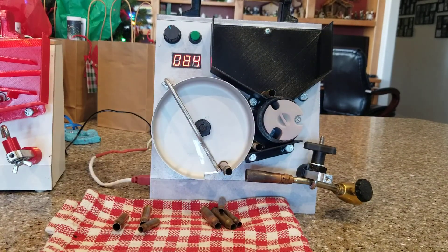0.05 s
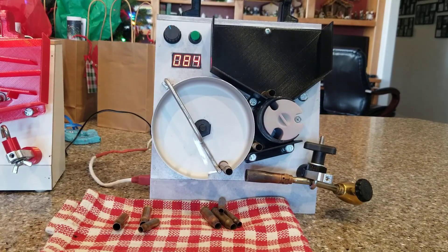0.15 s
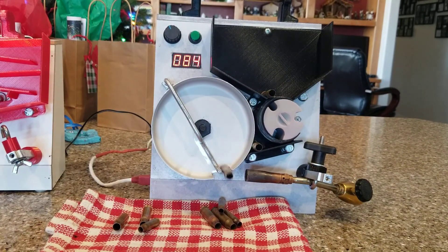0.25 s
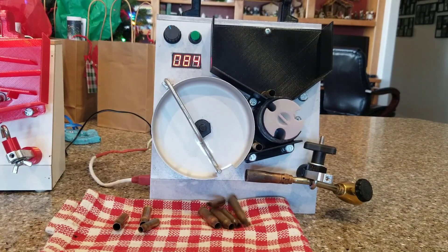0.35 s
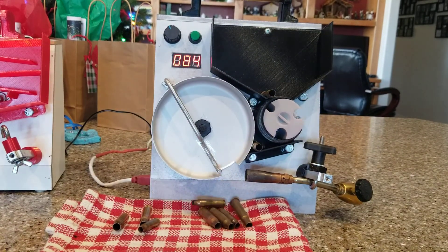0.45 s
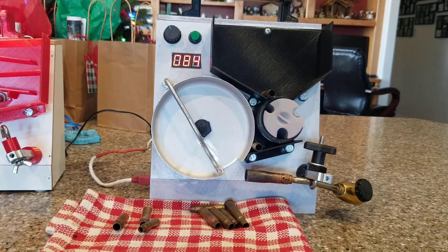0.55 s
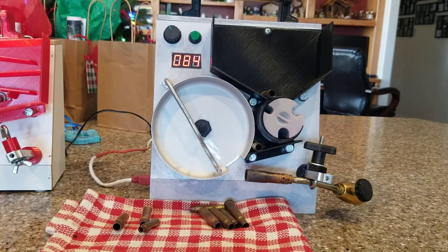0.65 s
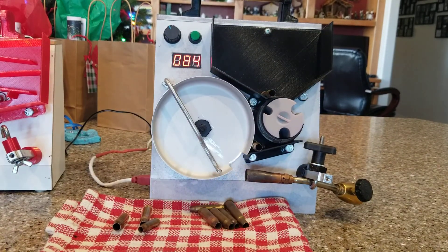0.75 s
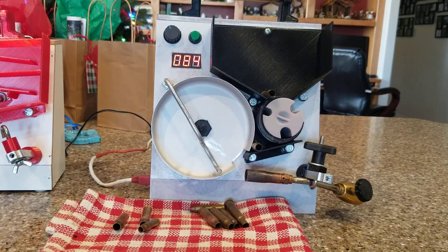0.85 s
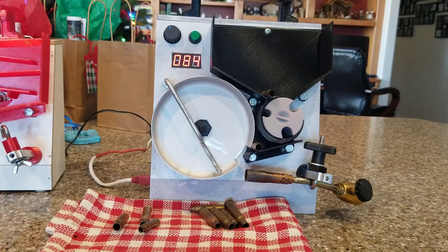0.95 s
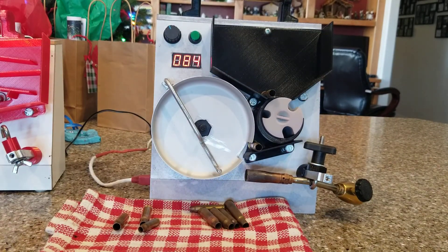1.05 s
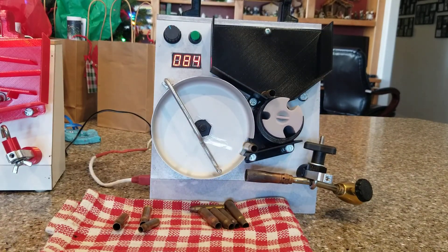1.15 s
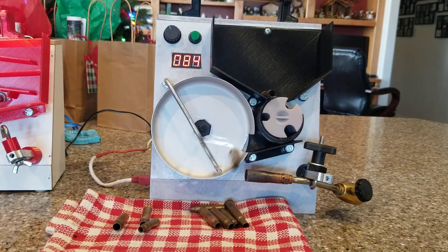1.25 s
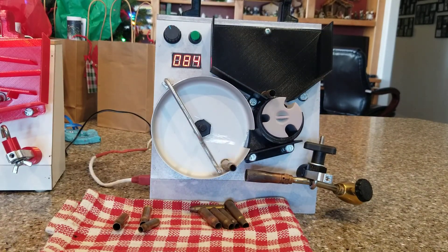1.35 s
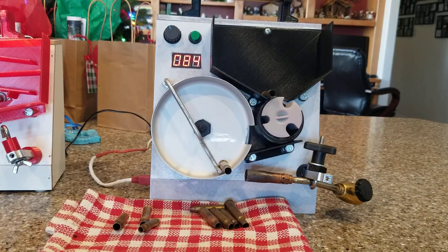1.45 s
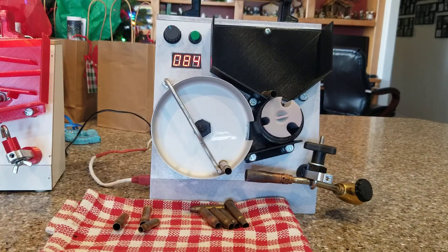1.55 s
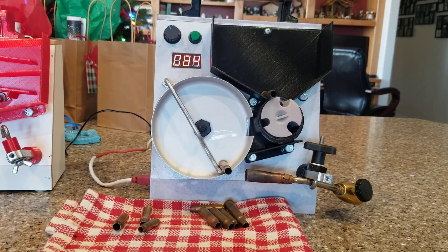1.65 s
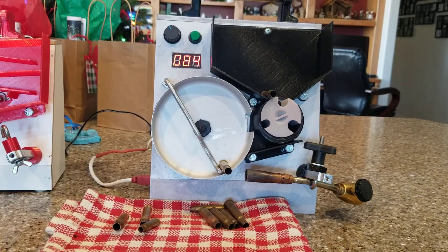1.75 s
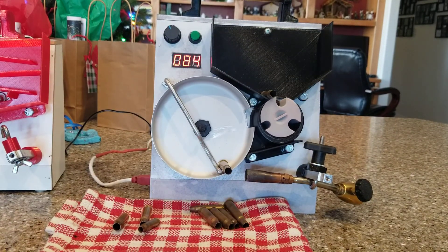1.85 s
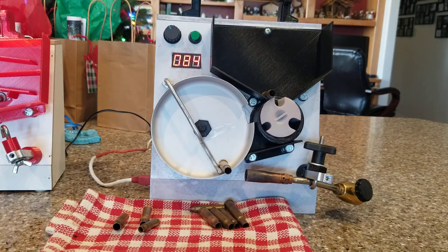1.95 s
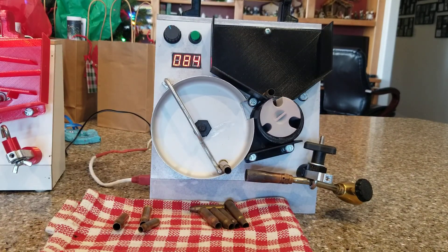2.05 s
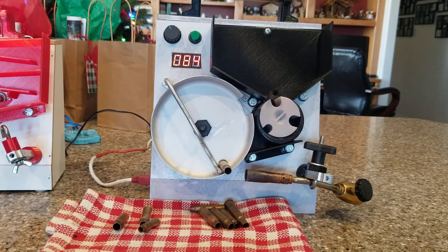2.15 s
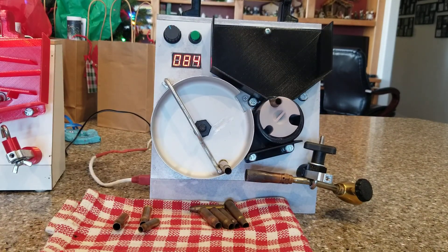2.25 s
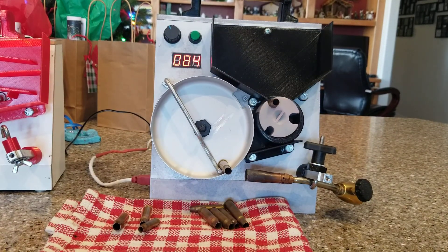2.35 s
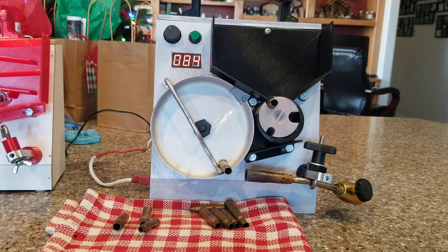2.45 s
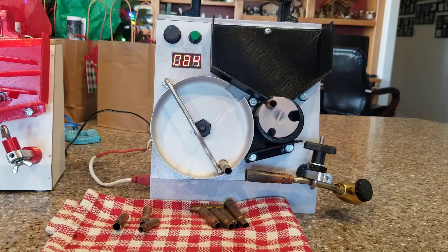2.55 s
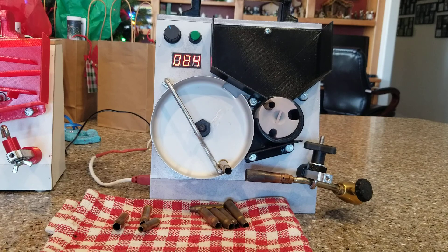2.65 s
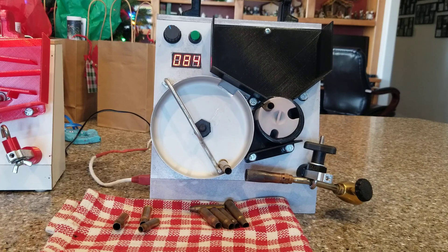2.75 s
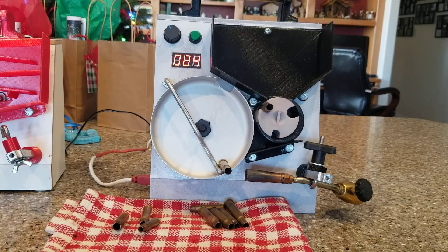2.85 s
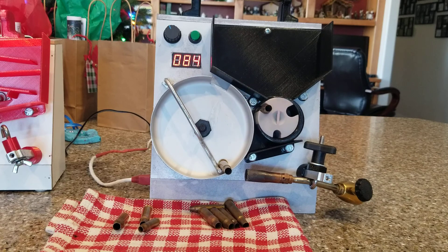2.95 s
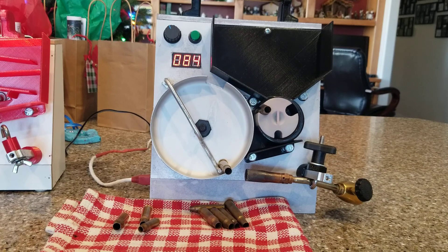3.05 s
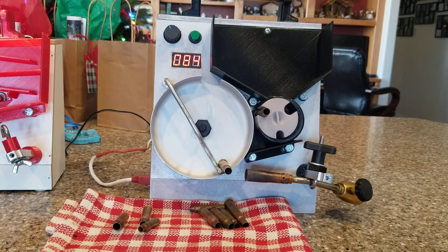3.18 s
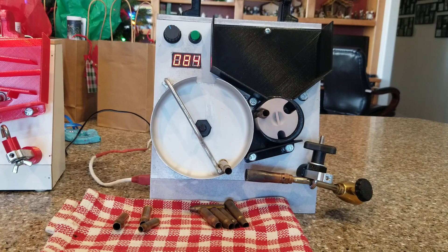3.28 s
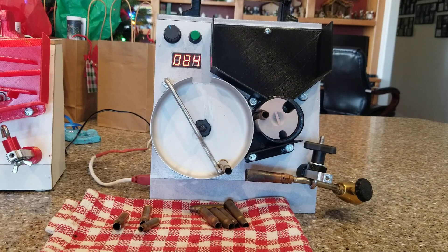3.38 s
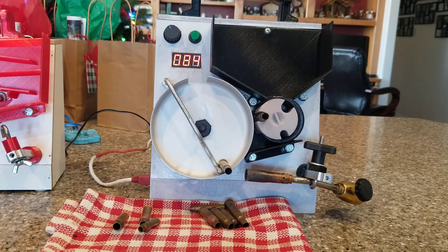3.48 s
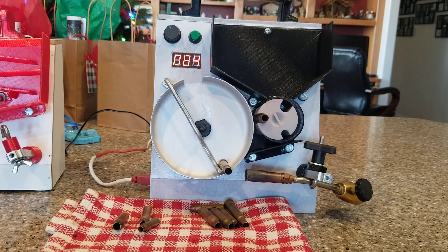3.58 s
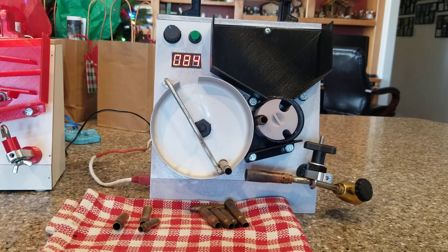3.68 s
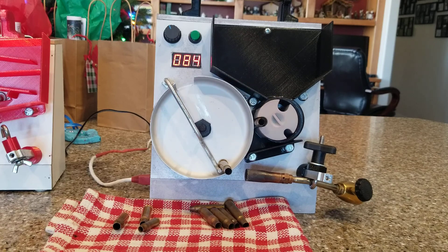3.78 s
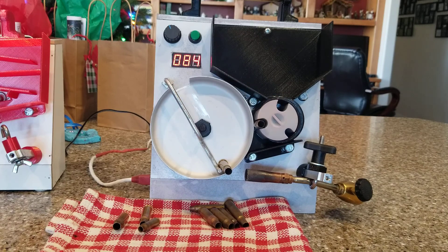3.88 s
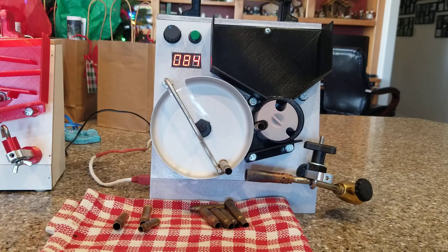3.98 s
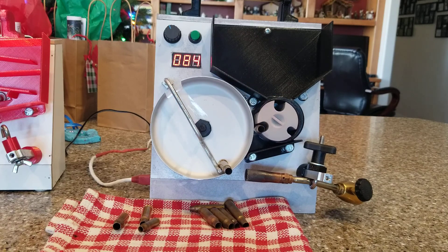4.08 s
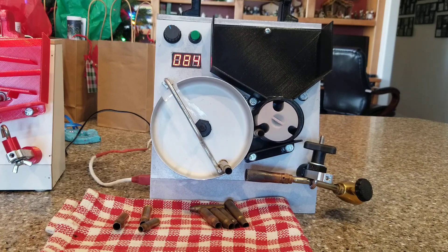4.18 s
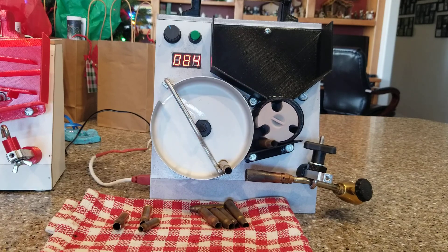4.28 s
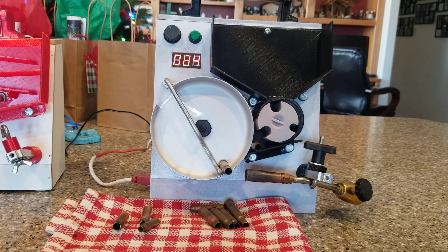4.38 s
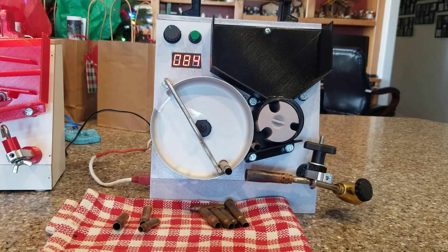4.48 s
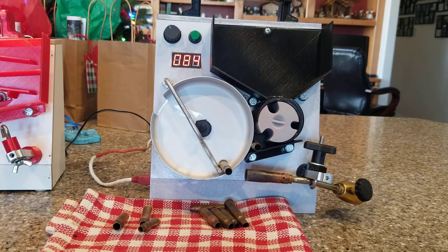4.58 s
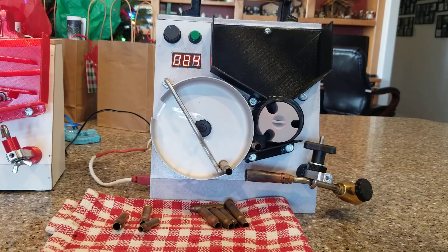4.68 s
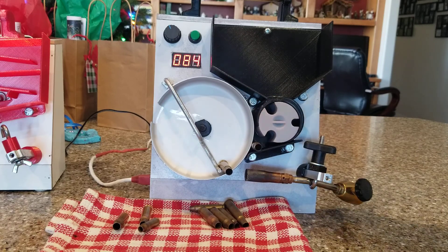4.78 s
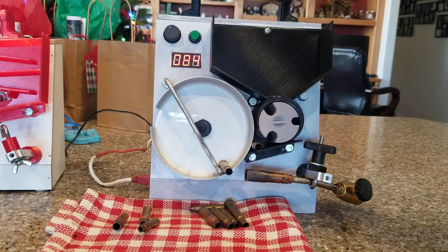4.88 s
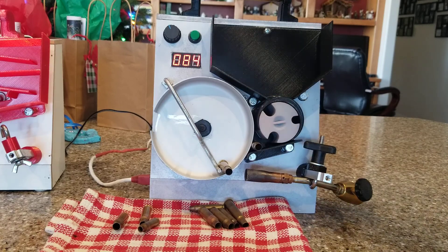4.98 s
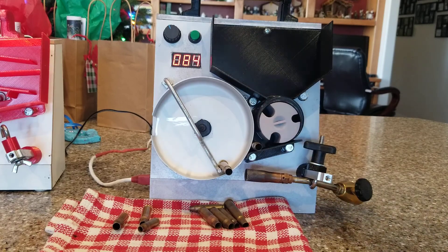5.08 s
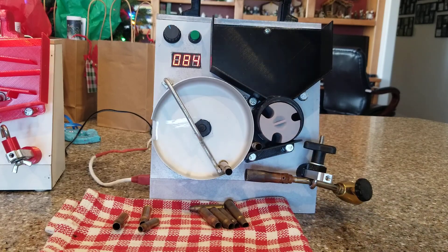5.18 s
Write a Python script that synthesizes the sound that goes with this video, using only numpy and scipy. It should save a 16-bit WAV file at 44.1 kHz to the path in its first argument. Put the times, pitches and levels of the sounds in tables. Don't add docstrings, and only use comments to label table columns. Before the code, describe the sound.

Brass cartridge cases clink on a pile, tumble ringing into a steel drum, then click through a feed wheel over a faint motor hum.

```python
import sys
import numpy as np
from scipy import signal
from scipy.fft import rfft, irfft, next_fast_len
from scipy.io import wavfile

SR = 44100
rng = np.random.default_rng(int(sys.argv[2]) if len(sys.argv) > 2 else 0)


def volts(x):
    e = np.asarray(x, float) / 20
    return 10 ** e


def generate_wav(signal):
    frames = np.transpose(np.atleast_2d(signal))
    scaled = np.clip(frames, -1, 1) * 32767
    pcm = np.round(scaled).astype(np.int16)
    wavfile.write(sys.argv[1], SR, pcm)


N = 230591

# (time [s], 15th order pitch [Hz], 15th order level [dB], load level [dB])
MOTOR = [(0, 1178, -76, -55.5), (.3, 1180, -67.5, -61.5), (1.05, 1180, -73, -62), (1.3, 1190, -83.5, -63.5),
         (2.05, 1215, -85, -56.5), (2.65, 1228, -70.5, -57.5), (3.2, 1243, -65.5, -57.5),
         (4.1, 1247, -65.5, -52.5), (4.3, 1240, -55, -40.5), (4.7, 1213, -71.5, -57.5),
         (5.23, 1210, -73, -53.5)]
# (time [s], pressure [dB])
RUB = [(0, -68.5), (.3, -62.5), (.6, -68), (1.0, -62), (1.12, -78), (2.3, -71.5), (2.8, -74.5),
       (3.75, -75.5), (3.9, -61), (4.2, -54.5), (4.47, -56.5), (4.6, -57), (5.23, -58)]
# (time [s], ring [dB], thud [dB], tick [dB])
PILE_HITS = [
    (.0794, -78.5, -57, -72),
    (.3225, 2, -52, -27.5),
    (.333, -2, -46.5, -35),
    (.383, -49, -72, -48),
    (.407, -49, -74, -39),
    (.427, -48, -79, -36),
    (.468, -44, -54, -54),
    (.5131, -30, -58.5, -38.5),
    (.545, -46, -69, -42),
]
RAMP_HITS = [
    (1.1989, -24.5, -44, -33),
    (1.2084, -25, -35, -36),
    (1.2462, -39, -35, -46.5),
    (1.2627, -16.5, -40.5, -36.5),
    (1.2784, -22.5, -38.5, -32.5),
]
DRUM_HITS = [(1.2875, -14, -37, -61), (1.2954, -10.5, -34.5, -53), (1.3099, -2, -32.5, -43),
             (1.3324, 1.5, -28.5, -39.5), (1.3504, 1.5, -36, -46.5), (1.3704, -4, -33.5, -47.5),
             (1.3884, -15.5, -35.5, -52.5), (1.3974, -25, -43, -47), (1.4204, -2, -39, -42),
             (1.4314, -35, -39.5, -53), (1.4514, -15, -38.5, -40), (1.482, -40, -47.5, -55)]
HOPPER_HITS = [
    (2.1814, -19, -30.5, -44.5),
    (2.1869, -48.5, -36.5, -57),
    (2.1994, -48, -34.5, -50),
    (2.2164, -46, -50, -53.5),
    (2.2253, -18, -40, -50.5),
    (2.2354, -33, -33.5, -72),
    (2.2436, -53, -35.5, -58),
    (2.2544, -40, -45, -71.5),
    (2.282, -49, -58, -67),
]
WHEEL_HITS = [(3.7953, -41, -42, -41), (3.9699, -75, -66, -82), (4.148, -54, -45, -48),
              (4.1684, -53.5, -84.5, -71), (4.2348, -60, -39.5, -54.5), (4.2477, -40, -39.5, -45),
              (4.2614, -62, -42, -85), (4.2814, -58, -30.5, -48), (4.2862, -42, -29, -42),
              (4.3254, -58, -56, -82), (4.367, -38, -37.5, -40), (4.3844, -45, -36.5, -47),
              (4.3994, -31.5, -52, -53), (4.4164, -56, -74, -58), (4.4912, -44, -41, -43),
              (4.6094, -53, -63, -81), (5.0694, -74, -65, -80)]
# (time [s], level [dB])
DRUM_KNOCKS = [(1.1991, -36), (1.2072, -37), (1.2466, -30.5), (1.2635, -26.5), (1.2793, -28),
               (1.2868, -29.5), (1.2934, -35.5), (1.3105, -32), (1.3335, -31.5), (1.3502, -38.5),
               (1.3916, -28.5), (1.4205, -36.5), (1.452, -42)]


def rms_one(x):
    return x / np.sqrt(np.mean(x ** 2) + 1e-20)


def in_time(rows):
    times, *columns = np.transpose(rows)
    return [np.interp(np.arange(N) / SR, times, column) for column in columns]


def colour(x, points, lag_s=0, turns=((1, 0),)):
    size = next_fast_len(N + 2048)
    hz = np.arange(size // 2 + 1) * SR / size + 1e-3
    point_hz, point_db = np.transpose(points)
    gain = volts(np.interp(np.log(hz), np.log(point_hz), point_db))
    phase = 2 * np.pi * hz * lag_s + np.interp(hz, *np.transpose(turns))
    return irfft(rfft(x, size) * gain * np.exp(-1j * phase), size)[:N]


def noise(points):
    return rms_one(colour(rng.standard_normal(N), [(5, -90)] + list(points) + [(22000, -90)]))


def drift(rate_hz):
    r = np.exp(-80 * np.pi * rate_hz / SR)
    slow = signal.lfilter([1], [1, -2 * r, r * r], rng.standard_normal(N // 40 + 2002))[2000:]
    return np.interp(np.arange(N) / 40, np.arange(len(slow)), rms_one(slow))


def ring(push, hz, t60):
    r = volts(-60 / (t60 * SR))
    w = 2 * np.pi * hz / SR
    return signal.lfilter([0, np.sin(w)], [1, -2 * r * np.cos(w), r * r], push + 1e-18)


def band(x, low_hz, high_hz):
    sos = signal.butter(2, [low_hz, min(high_hz, .45 * SR)], "band", fs=SR, output="sos")
    return signal.sosfilt(sos, x)


def struck(times, levels_db, modes, spread_db, longest):
    at = (np.asarray(times) * SR).astype(int)
    out = np.zeros(N)
    span = slice(at.min(), at.max() + SR // 2)
    chance = rng.standard_normal((len(at), len(modes)))
    for k, (hz, db, t60) in enumerate(modes):
        clicks = np.zeros(N)
        clicks[at] = volts(levels_db + db + spread_db * chance[:, k])
        out[span] += ring(clicks[span], hz, min(t60, longest)) - ring(clicks[span], hz, .005)
    return out


def rings(hits, modes, ring_db, longest):
    hits = np.array(hits)
    return struck(hits[:, 0], hits[:, 1] + ring_db, modes, 2.965, longest)


def clear_modes(pitches, modes, swell_s):
    out, t = np.zeros(N), np.arange(N + SR) / SR
    spin = np.array([drift(40), drift(30)])
    age = t[1:SR // 2 + 1]
    for hz, (t60, touches) in zip(pitches, modes):
        height = np.zeros(N + SR)
        rise = swell_s * min(1, 8000 / hz) ** 2
        for s, db in touches:
            after = slice(int(s * SR), int(s * SR) + SR // 2)
            height[after] *= np.exp(-age / .002)
            height[after] += volts(db - 60 * age / t60) * (1 - np.exp(-age / max(rise, 3e-4))) ** 2
        span = slice(int(touches[0][0] * SR), min(after.stop, N))
        loudness, pitch = np.roll(spin, rng.integers(N), axis=1)[:, span]
        out[span] += height[span] * volts(1.2 * loudness) * np.sin(2 * np.pi * hz * t[span] + .35 * pitch)
    return out


def crowd(blows, low_hz, high_hz, t60, db, count=90):
    out = np.zeros(N + SR)
    age = np.arange(min(SR // 3, int(2 * t60 * SR))) / SR
    pitch, life = rng.random((2, count, 1))
    hz = low_hz * (high_hz / low_hz) ** pitch
    lives = t60 * 1.6 ** (2 * life - 1)
    modes = volts(-60 * age / lives) * np.sin(2 * np.pi * hz * age)
    mixes = rng.standard_normal((len(blows), count)) @ modes / np.sqrt(count / 2)
    mixes = mixes * (1 - np.exp(-age / 0.001))
    for (s, blow_db), mix in zip(blows, mixes):
        out[int(s * SR):int(s * SR) + len(age)] += volts(blow_db + db) * mix
    return out[:N]


def contacts(hits, knock_over_tick_db, t60):
    return [(s, thud_db, tick_db + knock_over_tick_db, tick_db, t60) for s, _, thud_db, tick_db in hits]


def knocks(hits, body, body_db):
    s, thud_db, knock_db, tick_db, t60 = np.transpose(hits)
    shape, crack = np.zeros((3, N + SR)), np.zeros((3, N))
    age = np.arange(SR // 2) / SR
    for k in range(len(s)):
        at = int(s[k] * SR)
        gains = volts([thud_db[k], knock_db[k], tick_db[k]])[:, None]
        shape[:, at:at + len(age)] += gains * volts(-60 * age / max(t60[k], .005))
        crack[:, at:at + 40] += gains * rng.choice([-1, 1], 40) * volts(9 - 60 * age[:40] / 0.00075)
    crack[0] *= .3
    force = crack + shape[:, :N] * rng.standard_normal((3, N)) * volts(2.5 * drift(300))
    rattle = np.zeros(N)
    ranges_hz = [(330, 1300), (1300, 6500), (6500, 15800)]
    for part, share, (low, high) in zip(force, [.4, 1, 1], ranges_hz):
        part = band(band(share * part, low, high), 0.74 * low, high)
        rattle += part / np.sqrt(2 * (high - low) / SR)
    shake = band(band(force[0], 300, 2500), 270, 4000)
    for hz, db, _ in body:
        rattle += volts(db - 6) * ring(shake, hz, 0.02) / np.sqrt(.07 * SR / 28)
    return rattle + struck(s, thud_db + body_db, body, 3, 0.15)


def air():
    # (pitch [Hz], level per Hz [dB])
    air_colour = [(20, -49), (38, -8.5), (60, 5.5), (120, 7), (250, -15.5), (600, 5), (1300, -8),
                  (2000, -34.5)]
    load_db = in_time(MOTOR)[2]
    return volts(-70 + 0.71 * (load_db + 62) + 2 * drift(2.7)) * noise(air_colour)


def motor():
    # (time [s], level [dB])
    early_drone = [
        (0, -81.5),
        (.4, -65.5),
        (1.1, -63.5),
        (1.3, -86),
        (5.23, -98),
    ]
    # (order [turns], level over the load [dB])
    orders = [(1, -15.5), (3, -13.5), (9, -10), (14, -14.5), (16, -11.5)]
    # (pitch [Hz], width [Hz], level [dB])
    gears = [(332.3, 15.8, -6.5), (380.6, 6.2, -10), (449, 46, -6.5), (507.4, 25, -16), (710, 38, -18),
             (833, 11.87, -13.5), (1194, 86.4, -12), (2980, 150, -11.5), (4115, 25, -21),
             (4740, 208.5, -24.5), (9100, 270, -28.5)]
    whine_hz, whine_db, load_db = in_time(MOTOR)
    turn = 2 * np.pi * np.cumsum(whine_hz) / 15 / SR
    out = volts(whine_db + 5 + 2.2 * drift(19.1)) * np.sin(15 * turn + 0.54 * drift(21))
    drone_db = in_time(early_drone)[0] + 1.5 * drift(7)
    out += volts(drone_db) * (np.sin(6 * turn) + 0.47 * np.sin(8.7 * turn))
    for order, db in orders:
        out += volts(load_db + db - 7 + 3.2 * drift(7.1)) * np.sin(order * turn)
    teeth = rng.standard_normal(N) * (1 + 0.2 * np.cos(turn))
    for hz, width_hz, db in gears:
        tone = ring(ring(teeth, hz, 1.6 / width_hz), hz, .8 / width_hz)
        out += volts(load_db + db - 3.5 + 3.5 * drift(9)) * rms_one(tone)
    return out


def rubbing():
    # (pitch [Hz], level per Hz [dB])
    rub_low = [(200, 7), (500, -17.5), (1500, 9), (2200, 0.5), (4000, -3.5), (6500, -5.5), (8000, -39)]
    rub_high = [(5000, -26), (7200, -10), (8400, 3), (9500, -8), (10500, -1.5), (13000, 4), (16000, -2)]
    pressure_db, = in_time(RUB)
    grain = volts(1.5 * drift(23) + 1.5 * drift(5))
    return grain * (volts(pressure_db - 1) * noise(rub_low) + volts(pressure_db - 3.5) * noise(rub_high))


def chatter():
    start_s, end_s = 4.2, 4.8
    when, luck = rng.random((2, 70))
    times = start_s + when * (end_s - start_s)
    levels_db = np.interp(times, *np.transpose(RUB)) + 16 * luck
    return crowd(list(zip(times, levels_db)), low_hz=3196, high_hz=15501, t60=0.016, db=-3, count=24)


def bumps():
    # (time [s], level [dB])
    shudders = [
        (0.069, -61.5),
        (.52, -75),
        (2.27, -61),
        (4.6, -56.5),
        (5.08, -65),
        (5.168, -61),
    ]
    rise_s = 0.024
    times, levels_db = np.transpose(shudders)[:, :, None]
    age = np.maximum(np.arange(N) / SR - times, 0) / rise_s
    swell = np.sum(volts(levels_db) * age * np.exp(1 - age), axis=0)
    return swell * rms_one(band(rng.standard_normal(N), 55.7, 230))


def feeder():
    # (pitch [Hz], level [dB], t60 [s])
    hopper_modes = [(2584, -8, .08), (5600, -20, .03), (8441, -14, .06), (11210, -10, .06),
                    (12540, -24, .1), (14600, -14, .1)]
    wheel_modes = [(2587, -8, .1), (3900, -10, .1), (4423, -8, .1), (5600, -10, .06), (8300, -10, .1),
                   (12860, -14, .06), (13500, -12, .06), (14600, -15, .1)]
    # (time [s], level [dB], start pitch [Hz], end pitch [Hz], length [s])
    slips = [
        (2.434, -44, 14000, 10900, 0.0097),
        (2.546, -55, 13400, 11570, 0.0022),
        (2.574, -57, 12900, 11800, 0.0033),
    ]
    out = rings(HOPPER_HITS, hopper_modes, -0.44, 0.014) + rings(WHEEL_HITS, wheel_modes, 1.1, 0.12)
    for s, db, from_hz, to_hz, length_s in slips:
        count, at = int(length_s * SR), int(s * SR)
        glide = np.cumsum(np.linspace(from_hz, to_hz, count)) / SR
        out[at:at + count] += volts(db) * np.hanning(count) * np.sin(2 * np.pi * glide)
    return out


def drum():
    # (pitch [Hz], level [dB], t60 [s])
    drum_modes = [(3171, -30, .3), (3402, -26, .3), (5017, -32, .2), (7903, -25, .3), (10720, -18, .3),
                  (11350, -25, .3), (11940, -17, .15), (12050, -19, .2), (6880, -28, .3), (14510, -18, .07),
                  (15490, -27, .1)]
    boom_s, boom_db, boom_hz = 1.295, -38.5, 93.5
    hold_s, t60, rise_s = .13, .2, .04
    age = np.maximum(np.arange(N) / SR - boom_s, 0)
    height = volts(boom_db - 60 * np.maximum(age - hold_s, 0) / t60) * (1 - np.exp(-(age / rise_s) ** 2))
    boom = height * np.sin(2 * np.pi * boom_hz * age)
    return boom + rings(RAMP_HITS, drum_modes, -9, 0.07) + rings(DRUM_HITS, drum_modes, -9.5, 0.065)


def pile():
    # (pitch [Hz], level [dB], t60 [s])
    counter_modes = [(345, -14, 0.21), (433, -2.5, 0.14), (523, 3, 0.05), (688, -3.5, 0.11),
                     (732, -11.5, 0.19), (855, -5.5, 0.17), (1400, -11, 0.07)]
    pile_modes = [(9485, -30, .3), (9970, -23, .18), (10230, -24, .2), (10540, -22, .19), (12530, -23, .14),
                  (13840, -27, .15), (15110, -23, .13), (15460, -24, .2)]
    thud_s = .2905
    push = np.zeros(N)
    push[int(thud_s * SR)] = volts(-16)
    cloth = -band(band(ring(push, hz=800, t60=.008), 450, 2900), 190, 3700)
    thud = cloth + struck([thud_s], -29.5, counter_modes, 1, 0.25)
    return band(band(thud, 300, 9000), 260, 9000) + rings(PILE_HITS, pile_modes, -2.5, .16)


def snaps():
    # (time [s], level [dB])
    edge_blows = [(1.1996, -12), (1.2635, -12), (2.2258, -22), (2.4405, -58), (2.5405, -54), (4.288, -16),
                  (4.148, -38), (4.3675, -26), (4.4915, -19), (1.2084, -21), (2.182, -36), (2.1845, -36)]
    out, age = np.zeros(N), np.arange(90) / SR
    for s, db in edge_blows:
        out[int(s * SR):int(s * SR) + 90] += volts(db - 60 * age / .003) * rng.choice([-1, 1], 90)
    return band(out, 700, 17000)


def case_knocks():
    # (pitch [Hz], level [dB], t60 [s])
    cabinet = [(325, -2, .4), (436, -9, .3), (536, -7, .2), (690, -7.5, .12), (850, -9, .15),
               (1195, -13, .2), (1482, -11, .15), (1804, -14, .15), (2099, -13, .2)]
    hopper_wall = [(100, -22, .25), (188, -16, .2), (345, 0, .2), (452, -6, .15), (883, -14, .1)]
    # (time [s], ring [dB], thud [dB], tick [dB])
    slide_hits = [
        (1.107, -80, -47.5, -82),
        (1.137, -76.5, -39, -67.5),
        (1.155, -70, -55, -80.5),
    ]
    cabinet_hits = (contacts(PILE_HITS, -11, 0.014) + contacts(WHEEL_HITS, 2.6, 0.16)
                    + contacts(RAMP_HITS, 1, 0.17) + contacts(DRUM_HITS, -4, 0.05))
    out = knocks(cabinet_hits, cabinet, -3.5)
    out += knocks(contacts(HOPPER_HITS, 6.2, 0.04), hopper_wall, -3.5)
    slide = knocks(contacts(slide_hits, -6, 0.085), cabinet[1:5], 0.91)
    return out + band(slide, 328.7, 948.8)


def shells():
    # (time [s], level [dB])
    drum_blows = [(1.263, -26), (1.2805, -23), (1.2874, -29.5), (1.2954, -30), (1.3084, -25.5),
                  (1.3324, -20), (1.3504, -21), (1.3594, -36), (1.3704, -22.5), (1.3884, -53),
                  (1.3974, -29), (1.4204, -70), (1.4314, -26), (1.4514, -44)]
    hopper_knocks = [(2.1805, -36), (2.1866, -35), (2.1988, -49), (2.2132, -35), (2.225, -37),
                     (2.2361, -41), (2.2402, -35.5), (2.2488, -51), (2.262, -43)]
    wheel_knocks = [(3.7976, -41), (4.1462, -37), (4.2349, -28.5), (4.248, -28), (4.2825, -26),
                    (4.287, -19), (4.2985, -25), (4.3174, -28.5), (4.3678, -37), (4.384, -39),
                    (4.4003, -32), (4.4917, -28)]
    pile_blows = [
        (.3225, -27),
        (.333, -36),
        (.5131, -46.5),
    ]
    # (pitch [Hz]), then in the same order (t60 [s], touches (time [s], level [dB]))
    body_hz = [330, 705, 1206, 3440, 1480, 345, 1184, 2595, 3887, 4974, 8323, 13400, 850, 6880, 5900, 1750]
    body_modes = [(0.167, [(1.31, -26), (1.35, -32), (1.41, -30.5), (1.465, -36), (1.505, -43)]),
                  (0.26, [(1.265, -30), (1.29, -29.5), (1.31, -30), (1.42, -42)]), (0.12, [(1.388, -31),
                  (1.44, -35.5)]), (0.1512, [(1.287, -23.5), (1.30, -51), (1.40, -49), (1.448, -40),
                  (1.48, -59)]), (0.1197, [(1.292, -30), (1.333, -29.5)]), (0.11, [(2.182, -37.5),
                  (2.20, -32), (2.232, -38), (2.28, -49), (4.365, -40), (4.395, -36), (4.425, -45),
                  (4.447, -57)]), (0.055, [(4.25, -45), (4.29, -33)]), (0.16, [(3.797, -70), (3.818, -47)]),
                  (0.24, [(3.797, -52)]), (0.13, [(3.796, -42.5)]), (.12, [(3.797, -62), (3.972, -60)]),
                  (0.11, [(3.797, -35), (3.99, -56)]), (0.28, [(4.493, -42.5)]), (0.33, [(1.278, -45),
                  (1.31, -57), (1.35, -42.5), (1.368, -65)]), (0.027, [(1.1995, -14.5)]),
                  (0.041, [(.325, -38.5), (1.263, -26)])]
    out = crowd(drum_blows, low_hz=7398.5, high_hz=15697.5, t60=0.2559, db=-11)
    out += crowd(DRUM_KNOCKS, low_hz=906, high_hz=4304.5, t60=0.4148, db=-10)
    out += crowd(DRUM_KNOCKS, low_hz=4302, high_hz=7305.5, t60=0.34, db=-22)
    out += crowd(hopper_knocks, low_hz=948.5, high_hz=3100, t60=0.19, db=-10.5)
    out += crowd(wheel_knocks, low_hz=798, high_hz=3211, t60=0.0533, db=-4)
    out += crowd(pile_blows, low_hz=8501.5, high_hz=15802, t60=0.064, db=1)
    return out + clear_modes(body_hz, body_modes, .002)


def splinters():
    # (time [s], level [dB])
    wash_blows = [
        (0.3234, -39.5),
        (.333, -48),
        (0.514, -51),
        (1.199, -29),
        (3.797, -50),
        (4.371, -45),
        (4.493, -41),
    ]
    wheel_blows = [
        (4.3675, -43),
        (4.385, -38),
        (4.40, -43),
        (4.492, -54),
    ]
    # (pitch [Hz]), then in the same order (t60 [s], touches (time [s], level [dB]))
    twin_hz = [15176, 15459, 14600, 9550]
    twin_modes = [
        (0.26, [(.326, -29), (.37, -31), (.515, -45)]),
        (.3, [(.326, -27), (.37, -31), (.515, -42)]),
        (.1, [(2.227, -51.5), (2.256, -70)]),
        (.1, [(.515, -49), (.54, -70)]),
    ]
    out = crowd(wash_blows, low_hz=2401.5, high_hz=7197, t60=0.32, db=-10, count=150)
    out += crowd(wheel_blows, low_hz=3003, high_hz=15600, t60=0.1, db=-20, count=22)
    return out + clear_modes(twin_hz, twin_modes, .002)


def clear_rings():
    pile_hz = [1700, 7860, 10340, 11470, 12842, 13600, 15285]
    drum_hz = [2866, 4155, 8296, 9200, 10067, 10451, 13576, 2080]
    feeder_hz = [8441, 11210, 10950, 2945, 6194, 8300, 4450]
    # (t60 [s], touches (time [s], level [dB]))
    pile_clear = [
        (0.029, [(.512, -40), (.544, -33), (.562, -41)]),
        (0.28, [(.325, -20.5), (.368, -21), (.513, -43), (.565, -58)]),
        (0.21, [(.3225, -19), (.336, -19), (.358, -23), (.545, -38.5), (.572, -46.5)]),
        (0.39, [(.3235, -23.5), (.334, -24.5), (.362, -40.5), (.383, -25.5), (.445, -24), (.497, -33.5), (.567, -69.5)]),
        (0.2, [(.3235, -27), (.513, -45), (.538, -42)]),
        (0.19, [(.326, -21), (.352, -31.5), (.362, -23), (.394, -58), (.53, -63)]),
        (0.28, [(.3235, -32), (.334, -15.5), (.385, -24.5), (.5131, -12.5), (.524, -21), (.535, -28), (.567, -58)]),
    ]
    drum_clear = [
        (0.17, [(1.265, -33.5), (1.288, -33), (1.310, -24), (1.35, -37.5), (1.389, -37), (1.421, -26.5), (1.49, -40), (1.535, -78.5)]),
        (0.41, [(1.288, -27.5), (1.312, -35.5), (1.342, -39.5), (1.392, -36.5), (1.421, -31.5), (1.468, -46), (1.54, -64), (1.99, -67.5), (2.12, -58.5), (2.18, -83)]),
        (0.085, [(1.333, -22), (1.355, -40), (1.41, -38), (1.46, -39)]),
        (0.032, [(1.288, -22.5), (1.296, -22.5), (1.310, -15), (1.389, -21.5), (1.421, -21)]),
        (0.2904, [(1.30, -34), (1.35, -29.5), (1.39, -28)]),
        (0.233, [(1.288, -20.5), (1.309, -12.5), (1.350, -17), (1.392, -20), (1.428, -19.5), (1.462, -30.5)]),
        (0.22, [(1.395, -42), (1.432, -36), (1.452, -45.5)]),
        (0.084, [(1.2, -37.5), (1.2625, -23), (1.335, -37)]),
    ]
    feeder_clear = [
        (0.27, [(2.226, -42), (2.245, -41), (2.335, -66)]),
        (0.16, [(2.228, -52.5), (2.25, -45), (2.27, -44.5), (2.31, -74), (2.33, -63)]),
        (.8, [(4.326, -48.5), (4.365, -68)]),
        (0.093, [(4.383, -33), (4.405, -33)]),
        (0.13, [(4.367, -38.5), (4.398, -47), (4.422, -64)]),
        (0.28, [(4.39, -67), (4.425, -72)]),
        (0.15, [(4.385, -37), (4.405, -49)]),
    ]
    return (clear_modes(pile_hz, pile_clear, swell_s=0.0026) + clear_modes(drum_hz, drum_clear, swell_s=0.00048)
            + clear_modes(feeder_hz, feeder_clear, swell_s=0.001))


def room(x):
    t60, wall_cut_hz = 0.54, 9500
    size = next_fast_len(N + SR)
    z = np.exp(-2j * np.pi * np.arange(size // 2 + 1) / size)
    dull = np.exp(-2 * np.pi * wall_cut_hz / SR)
    wall = (1 - dull) / (1 - dull * z)
    spectrum, out = rfft(x, size), []
    for lags in (rng.uniform(.009, .04, (2, 8)) * SR).astype(int):
        loops = [volts(-60 * lag / SR / t60) * wall * z ** lag for lag in lags]
        echoes = sum((-1) ** k * loop / (1 - loop) for k, loop in enumerate(loops))
        out.append(irfft(spectrum * echoes, size)[:N])
    return np.array(out)


def scene():
    # (pitch [Hz], level [dB])
    shade = [(60, 6.5), (340, -2), (775, -4.5), (1300, -9), (2400, -7.5), (4400, -19.5), (7700, -42.5),
             (10300, -21.5), (11500, -28.5), (16000, -23.5)]
    # (pitch [Hz], turn [radians])
    shade_turn = [(70, 0), (170, .45), (600, .6), (1200, .5), (2400, 0)]
    machine = air() + motor() + rubbing() + chatter() + bumps()
    machine += feeder() + drum() + pile() + snaps() + case_knocks() + shells()
    room_gain = volts([[-20.5], [-22]])
    both = machine + room_gain * room(band(machine, 210, 19000))
    left, right = both + clear_rings() + splinters()
    return np.array([colour(left, shade, lag_s=.00011, turns=shade_turn), right])


def band_limit(x):
    return signal.sosfilt(signal.butter(12, 16870, fs=SR, output="sos"), x)


def record(dry):
    # (pitch [Hz], level per Hz [dB])
    left_hiss = [(25, -19.5), (60, -1), (500, -6), (1300, -11.5), (2000, 1.5), (3400, -29.5), (9000, -44.5),
                 (12000, -15.5)]
    right_hiss = [(2400, -12.5), (3300, 5.5), (6500, -10.5), (9700, -5), (10400, 3.5), (16000, -4.5)]
    hiss = [volts(-63) * noise(left_hiss), volts(-76) * noise(right_hiss)]
    top_cut = signal.cheby2(10, 24, 16150, fs=SR, output="sos")
    low_cut = signal.butter(2, 42, "high", fs=SR, output="sos")
    mix = signal.sosfilt(np.vstack([top_cut, low_cut]), dry + hiss)
    return band_limit(mix)


dry = scene()
out = record(dry)
generate_wav(out)
```